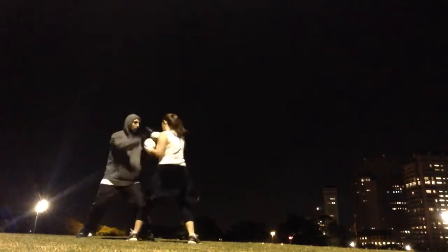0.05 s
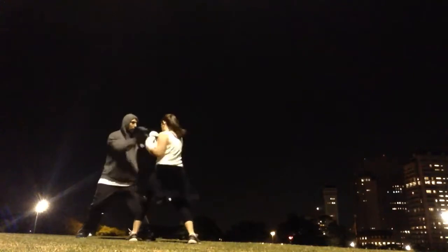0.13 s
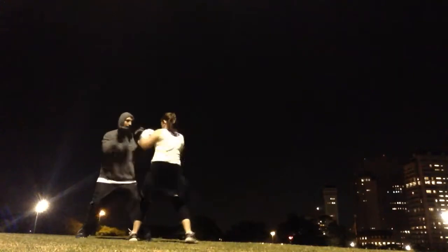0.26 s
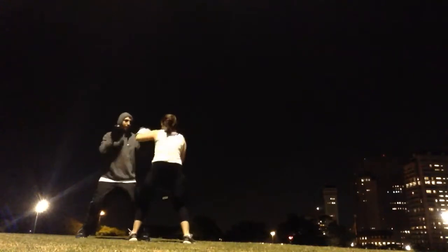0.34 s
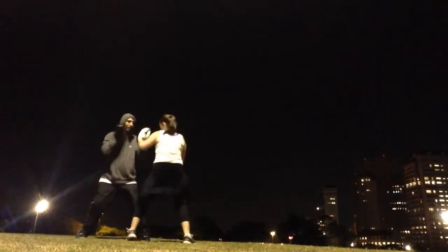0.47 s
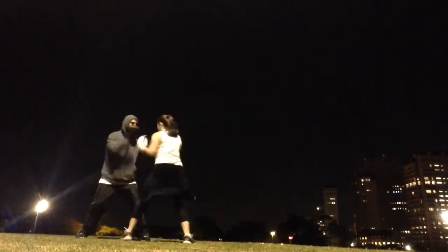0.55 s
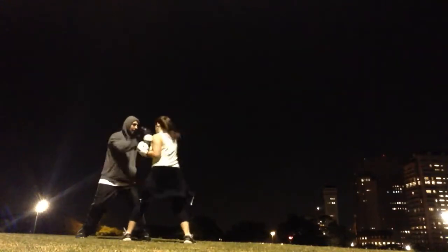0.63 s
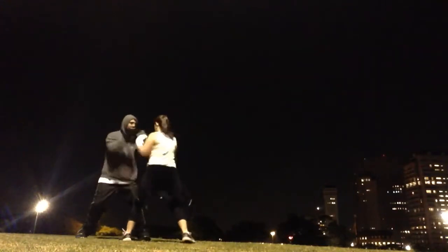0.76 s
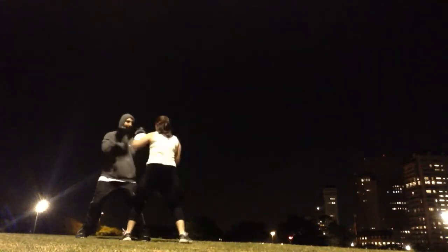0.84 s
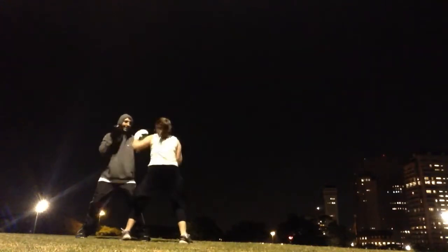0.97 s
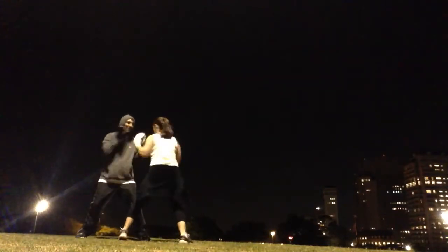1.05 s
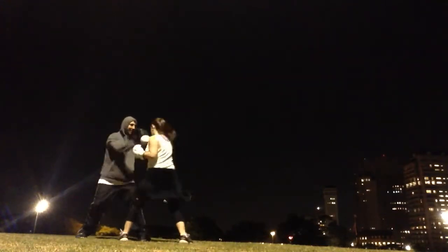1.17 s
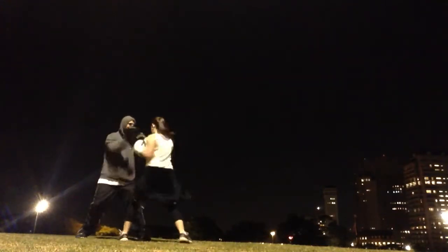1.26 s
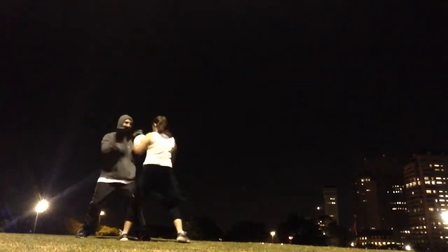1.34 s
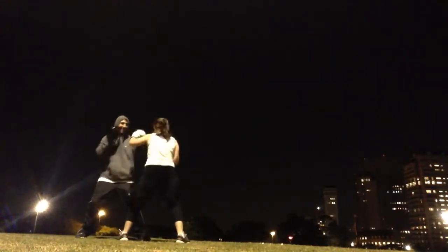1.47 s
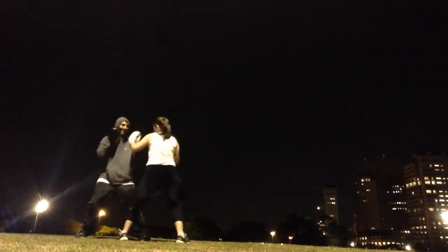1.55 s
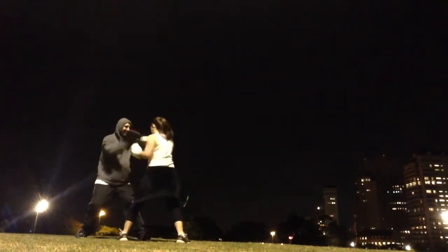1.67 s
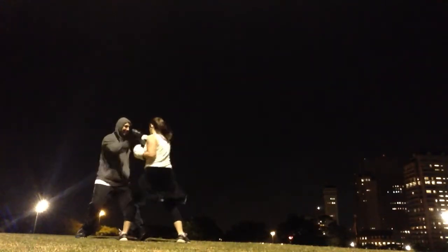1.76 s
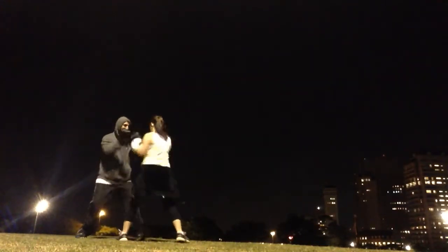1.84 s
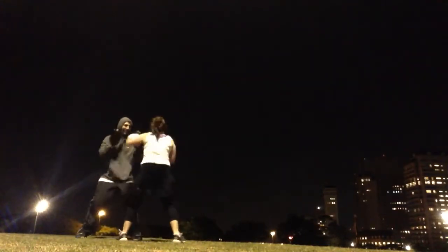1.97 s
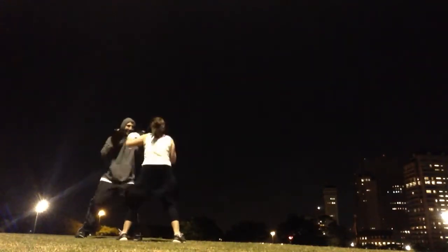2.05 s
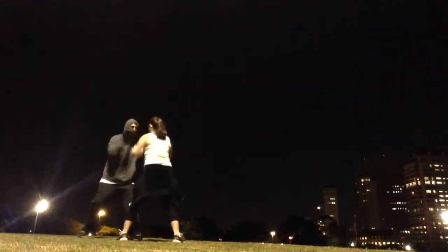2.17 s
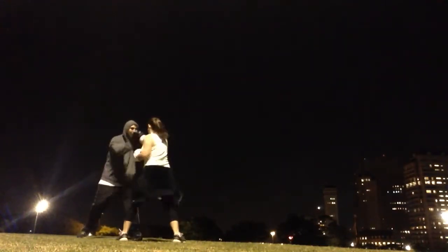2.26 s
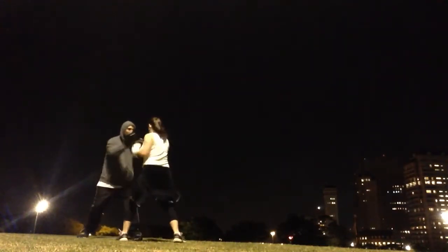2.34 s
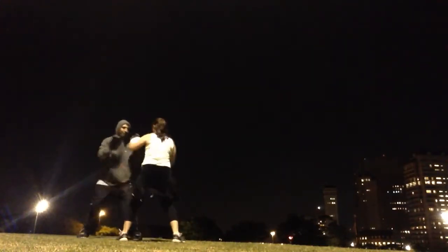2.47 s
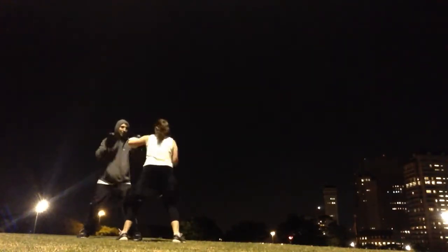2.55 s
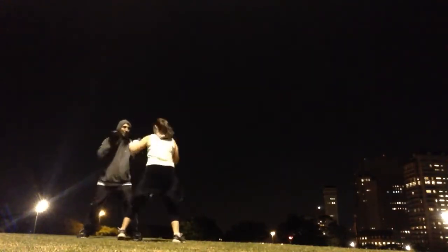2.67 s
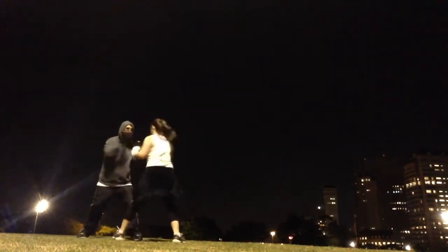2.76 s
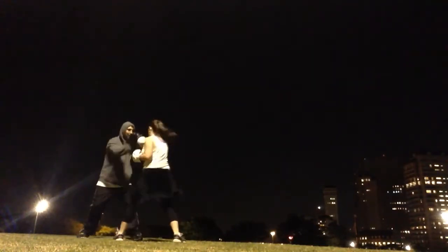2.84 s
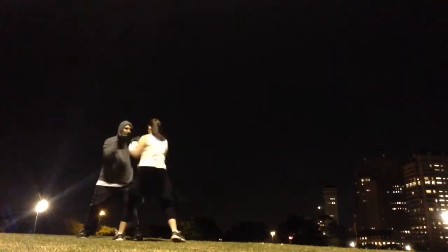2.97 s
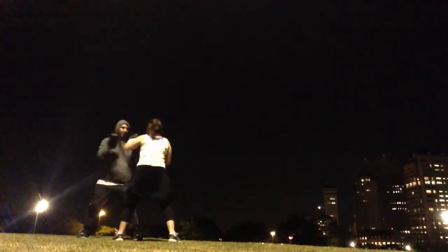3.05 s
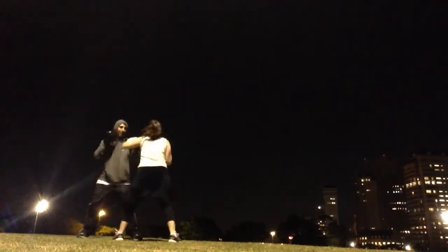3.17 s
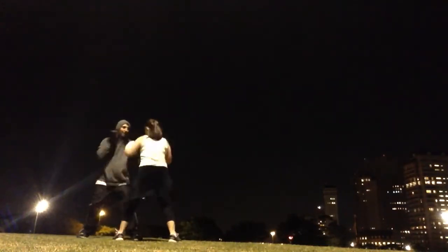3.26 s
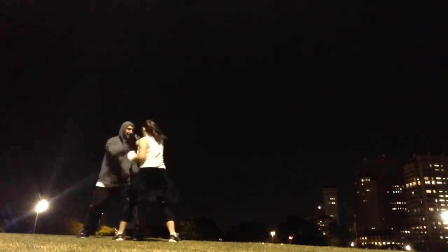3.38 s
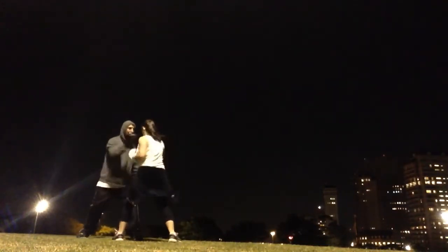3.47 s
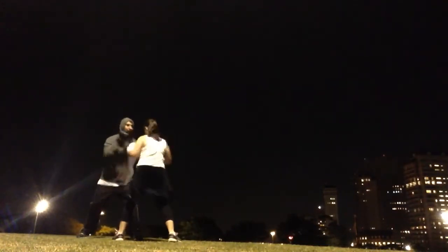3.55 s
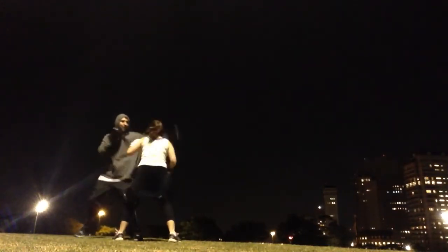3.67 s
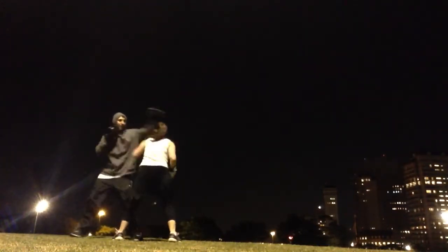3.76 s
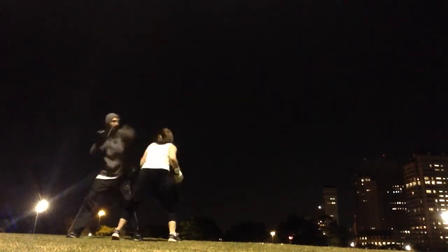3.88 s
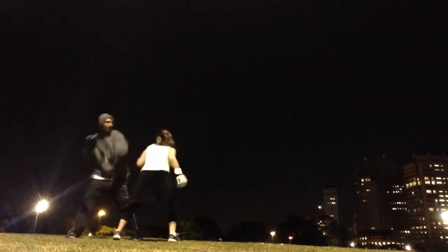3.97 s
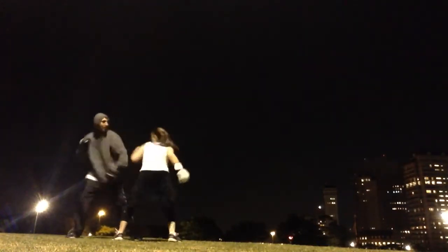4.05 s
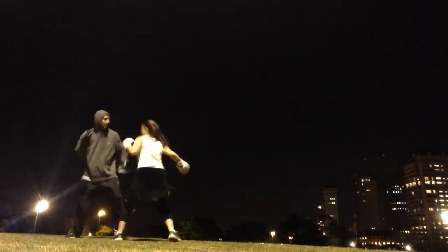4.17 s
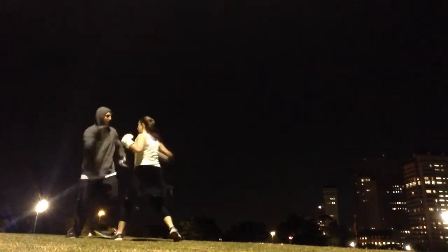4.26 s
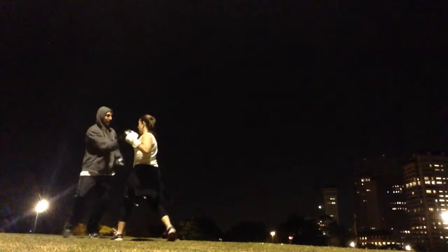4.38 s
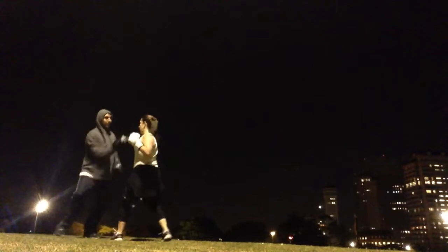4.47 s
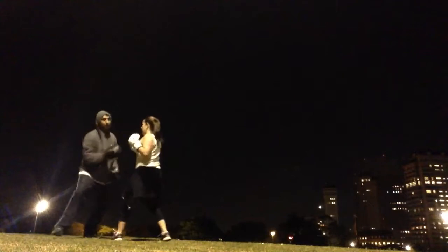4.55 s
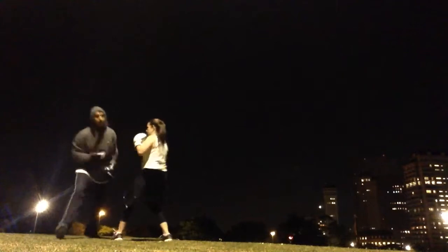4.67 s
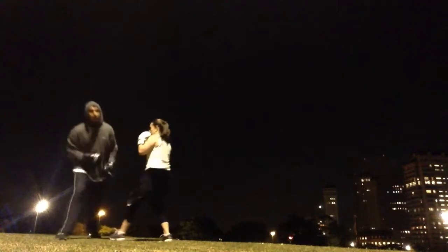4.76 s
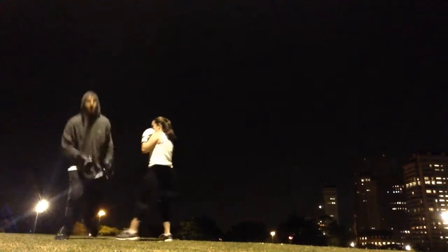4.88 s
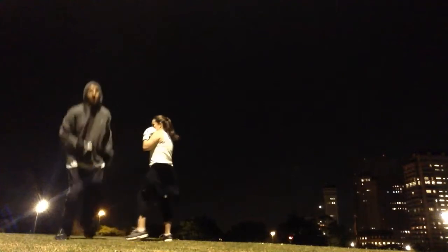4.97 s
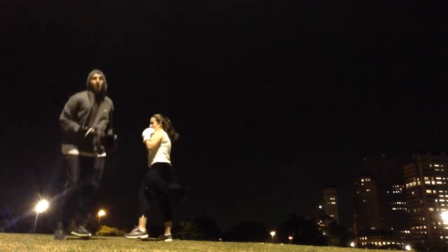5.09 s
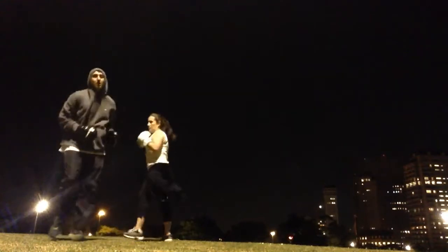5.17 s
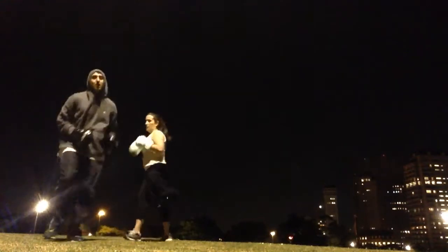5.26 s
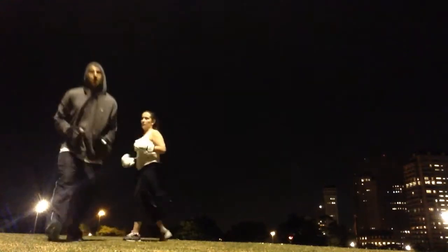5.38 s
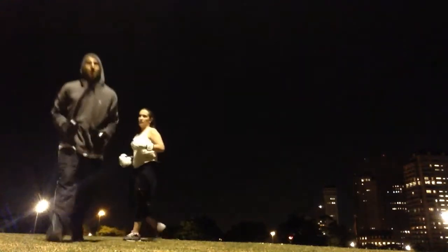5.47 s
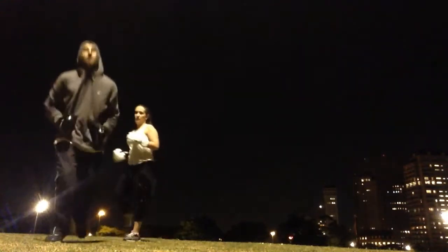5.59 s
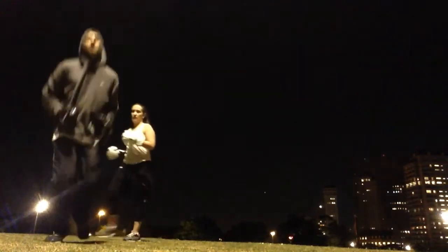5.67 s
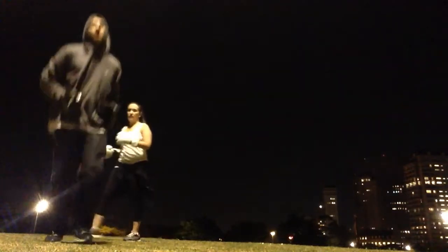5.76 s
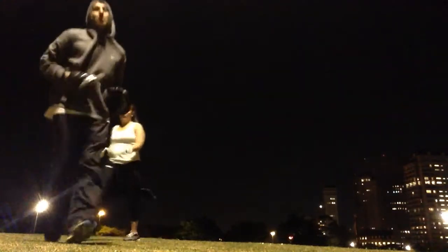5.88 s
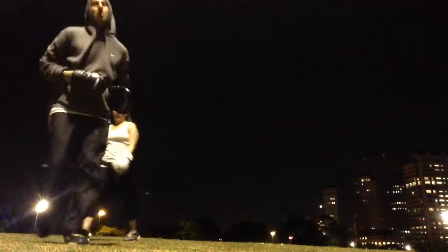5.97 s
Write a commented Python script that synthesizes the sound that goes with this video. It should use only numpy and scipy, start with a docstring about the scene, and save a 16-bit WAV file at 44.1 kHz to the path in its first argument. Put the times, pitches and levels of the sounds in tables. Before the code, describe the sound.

Boxing gloves smack padded mitts in a quick, even run outdoors at night, then one harder final punch after a pause, with rustling clothes and distant traffic.

```python
"""Boxing practice on a lawn

Boxing gloves strike padded mitts in a quick, even run, then once more after a pause, at night.
Each punch adds ringing tones for the padded thud and the pop of trapped air to grainy noise for the leather.
The open lawn returns almost no echo, only a faint tail of fading noise.
Low tones make the footsteps, and shaped noise makes the ticking, rustling clothes and far city traffic."""
import sys
import numpy as np
from scipy import signal
from scipy.fft import rfft, irfft, next_fast_len
from scipy.io import wavfile
from scipy.ndimage import map_coordinates

SR = 44100
rng = np.random.default_rng(int(sys.argv[2]) if len(sys.argv) > 2 else 0)


def wav_record(signal):
    """Record a signal, one row per channel, as 16-bit PCM in the file named by sys.argv[1]."""
    frames = np.transpose(np.atleast_2d(signal))
    bounded = np.clip(frames, -1, 1)
    # unit amplitude maps onto the largest positive 16-bit level
    quanta = np.round(bounded * 32767).astype(np.int16)
    wavfile.write(sys.argv[1], SR, quanta)


N = 265651
AGE = np.arange(SR // 8) / SR  # time inside a short sound (s)


def amp(db):
    """Turn decibels into a gain."""
    return 10 ** (np.asarray(db) / 20)


def unit(x):
    """Scale to an rms of 1."""
    return x / np.sqrt(np.mean(x ** 2) + 1e-20)


def blow(x):
    """Scale a short sound to the energy of 10 ms at an rms of 1."""
    return x * np.sqrt(SR / 100 / (np.sum(x ** 2) + 1e-20))


def along(points, hz):
    """Read values between (Hz, value) points, on a log frequency axis."""
    point_hz, values = np.transpose(points)
    return np.interp(np.log(hz + 1), np.log(point_hz + 1), values)


def curves(rows):
    """Give one value per sample for each column after the time."""
    seconds, *columns = np.transpose(rows)
    return [np.interp(np.arange(N) / SR, seconds, column) for column in columns]


def wobble(rate):
    """Draw a smooth random curve with rate random points a second."""
    points = rng.standard_normal(int(N * rate / SR) + 4)
    return map_coordinates(points, [np.arange(N) * rate / SR])


def noise(spectrum):
    """Make steady coloured noise with an rms of 1."""
    size = next_fast_len(N + 8192)
    gain = amp(along(spectrum, np.fft.rfftfreq(size, 1 / SR)))
    return unit(irfft(rfft(rng.standard_normal(size)) * gain, size)[:N])


def coloured(x, spectrum, size=8192):
    """Colour a short sound without smearing backward in time, so its attack stays sharp."""
    gain = amp(along(spectrum, np.fft.rfftfreq(size, 1 / SR)))
    # folding the cepstrum forward gives a minimum-phase filter
    cepstrum = irfft(np.log(gain))
    cepstrum[1:size // 2] *= 2
    cepstrum[size // 2 + 1:] = 0
    return irfft(rfft(x, size) * np.exp(rfft(cepstrum)))[:len(x)]


def fade(t60):
    """Die away exponentially, by 60 dB in t60 seconds."""
    return np.exp(-np.log(1000) * AGE / t60)


def ring(hz, t60):
    """Sound one tone that dies away, like a struck object."""
    return np.sin(2 * np.pi * hz * AGE) * fade(t60)


def crinkle(t60, spiky_db):
    """Make a dying burst of tiny slips of uneven size."""
    sizes = amp(spiky_db * rng.standard_normal(len(AGE)))
    return rng.standard_normal(len(AGE)) * sizes * fade(t60)


def add(track, s, x):
    """Mix x into the track from time s."""
    i = max(round(s * SR), 0)
    track[i:i + len(x)] += x[:max(len(track) - i, 0)]


# Loudness of the far traffic, before each layer's own trim: start_s, level_db
TRAFFIC_LEVEL = [(0.0, -63), (0.28, -63), (1.79, -64.5), (2.78, -62.5), (3.12, -67), (4.83, -63.5),
                 (6.02, -63.5)]
# Cloth and grass calm down as the run ends, then grow as the boxers walk closer.
# Levels before each layer's trim: start_s, swish_db, hiss_db
RUSTLE_LEVEL = [(0.0, -76, -79.5), (1.05, -80, -83.5), (1.37, -77.5, -81), (1.56, -81.5, -84.5),
                (1.94, -77.5, -83.5), (2.11, -83, -85), (2.75, -79, -80.5), (2.95, -84.5, -82),
                (3.24, -87.5, -88), (4.39, -77, -82.5), (4.61, -78, -72), (5.2, -74, -78),
                (5.38, -68, -73.5), (6.02, -73, -76)]
# Colours of the low traffic, higher traffic, thin hiss and swishing cloth: pitch_hz, level_db
TRAFFIC_RUMBLE = [(15, -44.5), (25, -16.5), (45, -5), (65, 2.5), (90, 0), (140, -4.5), (210, -9.5),
                  (320, -15.5), (500, -34.5), (1000, -62)]
TRAFFIC_WASH = [(150, -28.5), (400, 4), (900, -3.5), (1500, -10), (2500, -17), (5000, -37), (15000, -54)]
HISS_COLOUR = [(1000, -22.5), (4000, -7.5), (7500, -1), (10000, -5), (15000, -3.5), (16000, -26)]
CLOTH_COLOUR = [(1000, -18), (2500, 5), (3800, 2), (5800, -1), (8000, -12), (14000, -22)]


def surroundings():
    """Far traffic, a thin hiss and swishing cloth and grass are noises whose levels waver at random."""
    city_db, = curves(TRAFFIC_LEVEL)
    swish_db, hiss_db = curves(RUSTLE_LEVEL)
    rumble = amp(city_db + 17.5 + 1.8 * wobble(11)) * noise(TRAFFIC_RUMBLE)
    wash = amp(city_db - 0.4 + 0.6 * wobble(5.4)) * noise(TRAFFIC_WASH)
    hiss = amp(hiss_db - 0.55 + 0.7 * wobble(47)) * noise(HISS_COLOUR)
    swish = amp(swish_db - 3 + 1.2 * wobble(34)) * noise(CLOTH_COLOUR)
    return rumble + wash + hiss + swish


# Colour of rubbing cloth, drawn around 1 kHz: pitch_hz, level_db
RUB_COLOUR = [(250, -38.5), (650, -10), (880, -1), (1120, -7), (1500, -11), (3500, -35.5)]


def rubbing(centre_hz):
    """Rubbing cloth is noise gathered around a centre frequency."""
    return noise([(hz * centre_hz / 1000, level_db) for hz, level_db in RUB_COLOUR])


SWING_S, STOP_S = 0.075, 0.035  # time constants of the swish before and after contact (s)


def sleeves():
    """A sleeve swishes up as the arm speeds toward the mitt and dies as it stops."""
    t, swell = np.arange(N) / SR, np.zeros(N)
    for s, *_, swish_db in PUNCH_LIST:
        swell += amp(swish_db) * np.exp(-np.maximum((s - t) / SWING_S, (t - s) / STOP_S))
    return swell * rubbing(centre_hz=4300)


# Colour of the rustling cuff: pitch_hz, level_db
CUFF_COLOUR = [(200, -5), (900, 5), (4500, -9), (12000, -21.5)]


def approach(force_db, crinkle_db):
    """Before contact the rushing glove pulls the pressure down, and its cuff rustles."""
    suction = -amp(force_db - 12.5) * blow(fade(t60=0.0067))
    rustle = coloured(crinkle(t60=0.091, spiky_db=-1.0), CUFF_COLOUR)
    cuff = amp(crinkle_db - 18.5) * blow(rustle)
    return (suction + cuff)[::-1]  # reversed, so that both grow toward the contact


# Colours of the leather's slap and its bright snap: pitch_hz, level_db
SLAP_COLOUR = [(400, -11), (1300, -7), (2800, 0), (6300, 1.5), (8500, -10.5), (16000, -22)]
SNAP_COLOUR = [(3000, -36), (7000, -3.5), (9000, -5), (13000, -8), (16000, -11)]


def crack(crack_db, crack_hz, snap_db):
    """The leather slap drops the pressure steeply, then swings back only once or twice."""
    slap = coloured(-ring(crack_hz, t60=0.00061), SLAP_COLOUR)
    snap = coloured(crinkle(t60=0.0025, spiky_db=3), SNAP_COLOUR)
    return amp(crack_db) * blow(slap) + amp(snap_db - 1.5) * blow(snap)


POP_HZ, POCKET_OCT = 970, 0.025  # pitch at medium depth; drop per dB of depth (octaves)


def air_pop(pop_db, depth_db):
    """Trapped air pops as two short tones; a deeper punch traps a larger, lower pocket."""
    pop_hz = POP_HZ * 2 ** (-POCKET_OCT * depth_db)
    tones = ring(pop_hz, t60=0.007) + 0.5 * ring(1.6 * pop_hz, t60=0.0075)
    return amp(pop_db - 5.5) * blow(tones)


# Colour of the crackle as a glove lifts off: pitch_hz, level_db
PEEL_COLOUR = [(300, -1.5), (1500, -1.5), (4000, -0.5), (6500, -0.5), (8000, -8.5), (12000, -9),
               (16000, -17.5)]


def peel():
    """The leather creaks on after the blow and crackles as the glove lifts off the mitt."""
    swell = np.exp(-0.5 * ((AGE - 0.035) / 0.008) ** 2) + 2.0 * fade(t60=0.2)
    # the size of the slips wanders, so the grains come in clumps
    slips = np.interp(AGE, AGE[::64], rng.standard_normal(len(AGE[::64])))
    grains = rng.standard_normal(len(AGE)) * amp(6.8 * slips)
    return blow(coloured(grains * swell, PEEL_COLOUR))


# Colour of the crinkling leather: pitch_hz, level_db
LEATHER_COLOUR = [(500, -19.5), (1500, 4), (3500, 1), (6000, -1), (8000, -4.5), (12000, -14.5),
                  (16000, -21)]


def creasing(crinkle_db):
    """The leather crinkles at the blow, with a fainter creak and peel after it."""
    leather = coloured(crinkle(t60=0.022, spiky_db=7.5), LEATHER_COLOUR)
    return amp(crinkle_db + 3.5) * blow(leather) + amp(crinkle_db - 17.0) * peel()


# The padding's deep tones, each punch shifting them slightly: pitch_hz, level_db, t60_s
PADDING_TONES = [(96, 1, 0.042), (180, 5.5, 0.028), (251.7, 0.5, .02)]
# Colour of the crushed foam: pitch_hz, level_db
FOAM_COLOUR = [(150, -16.5), (350, -4), (600, 3), (800, 2.5), (1050, -15.5), (2500, -26)]
FOAM_DB, KNOCK_DB, KNOCK_HZ = -37.5, -32, 391  # at medium depth
# a deeper punch knocks louder (dB per dB) and stiffens the pad (octaves per dB)
KNOCK_GROWS, STIFFEN_OCT = 0.6, 0.028


def padding(force_db, depth_db):
    """The padding gives with a deep thud, a knock of the compressed pad and a puff of foam."""
    size = np.exp(0.03 * rng.standard_normal())  # every glove lands a little differently
    tones = sum(amp(db) * ring(hz * size, t60) for hz, db, t60 in PADDING_TONES)
    thud = amp(force_db + 1.5) * blow(tones)
    knock_hz = KNOCK_HZ * 2 ** (STIFFEN_OCT * depth_db)
    knock = amp(KNOCK_DB + KNOCK_GROWS * depth_db) * blow(ring(knock_hz, t60=0.016))
    puff = coloured(crinkle(t60=0.022, spiky_db=0), FOAM_COLOUR)
    return thud + knock + amp(FOAM_DB + depth_db) * blow(puff)


# Colour of a tick: pitch_hz, level_db
TICK_COLOUR = [(2000, -27.5), (6000, -9.5), (9000, -4), (13000, -2), (16000, -16)]


def tick(db):
    """One small click of cloth, strap or leather is a short grainy burst."""
    return amp(db - 16.5) * blow(coloured(crinkle(t60=0.04, spiky_db=1.5), TICK_COLOUR))


# Every punch, levels before each part's own trim: start_s, force_db, depth_db (into the foam),
# pop_db (trapped air), crack_db, crack_hz, snap_db (bright snap), swish_db (sleeve)
PUNCH_LIST = [(0.1421, -25.5, -1, -34, -37, 3600, -34, -68), (0.4066, -26, 5.5, -21.5, -27, 3040, -63, -72),
              (0.6873, -24.5, -1.5, -35, -24.5, 4800, -42, -65),
              (0.9607, -24, 1.5, -23.5, -29.5, 3748, -60.5, -78),
              (1.2348, -27.5, 0, -49.5, -24, 5520, -42.5, -72),
              (1.5015, -26.5, 0.5, -23.5, -25.5, 4380, -42, -81.5),
              (1.7826, -27.5, -7, -31.5, -25.5, 4500, -31.5, -72),
              (2.0547, -28, 4.5, -28, -30, 3810, -43, -78.5),
              (2.3143, -26.5, -4.5, -37.5, -41.5, 7070, -35, -82),
              (2.6013, -26, 3, -28.5, -35.5, 3700, -51, -82),
              (2.9012, -31.5, -3.5, -37.5, -25.5, 4200, -29, -70),
              (3.1702, -29, 1, -29, -41.5, 4800, -45, -81),
              (3.4602, -28, -6.5, -54.5, -30, 4195, -37.5, -86.5),
              (4.4405, -23, 11, -47, -27, 6000, -39.5, -80.5)]
CRINKLE_DB, SNAP_SHARE = -11.5, 0.12  # crinkle against the force; share taken from the snap
LIFT_S, LIFT_DB = 0.036, -21  # tick as the glove leaves: delay, and setting against the snap's


def punches():
    """The leather faces slap together, trapped air pops out and the padding gives."""
    faces, body = np.zeros(N), np.zeros(N)
    for s, force_db, depth_db, pop_db, crack_db, crack_hz, snap_db, _ in PUNCH_LIST:
        # the crinkle follows the force of the punch and, in part, its snap
        crinkle_db = CRINKLE_DB + force_db + SNAP_SHARE * (snap_db - force_db)
        add(body, s - len(AGE) / SR, approach(force_db, crinkle_db))
        add(faces, s - 0.0001, crack(crack_db, crack_hz, snap_db))
        add(faces, s + 0.00017, air_pop(pop_db, depth_db) + creasing(crinkle_db))
        add(body, s + 0.00056, padding(force_db, depth_db))
        add(faces, s + LIFT_S, tick(snap_db + LIFT_DB))
    # a small mitt cannot radiate the deepest bass
    bass_cut = signal.butter(2, 58, "highpass", fs=SR, output="sos")
    return faces + signal.sosfilt(bass_cut, body)


# How long the scattered sound lasts: pitch_hz, t60_s
SCATTER_TIME = [(200, 0.6), (1500, 0.63), (5000, 0.059), (12000, 0.11)]


def park(hits):
    """Bodies, lawn and trees scatter a faint tail of fading noise, different for each punch."""
    out = np.zeros(N)
    for s, *_ in PUNCH_LIST:
        hz, t, cells = signal.stft(rng.standard_normal(SR // 3), SR, nperseg=256)
        decay = np.exp(-np.log(1000) * t / along(SCATTER_TIME, hz)[:, None])
        tail = signal.istft(cells * decay, SR, nperseg=256)[1]
        tail *= amp(-35.5) / np.linalg.norm(tail)
        start = s - 0.01  # begin just ahead of the contact
        punch = hits[round(start * SR):][:len(AGE)]
        add(out, start, signal.fftconvolve(punch, tail))
    return out


# Gloves sliding off the mitts and shoes scuffing the grass, levels before the random grain:
# middle_s, level_db, pitch_hz (centre), half_length_s
BRUSH_LIST = [(0.169, -58, 3900, 0.036), (1.251, -61.5, 5260, .03), (4.527, -61, 2600, 0.011),
              (4.714, -75, 9380, 0.025), (5.79, -66, 7170, 0.014), (5.983, -65, 2400, 0.017),
              (6.008, -53, 546, 0.013)]


def brushes():
    """Cloth, leather or grass rub past each other in short grainy swells of noise."""
    out, t = np.zeros(N), np.arange(N) / SR
    for s, db, centre_hz, half_s in BRUSH_LIST:
        swell = np.exp(-0.5 * ((t - s) / half_s) ** 2)
        out += amp(db) * swell * rubbing(centre_hz)
    return out * amp(1.6 * wobble(250))


# The clearest ticks of clothing and straps, before the tick's own trim: start_s, level_db
CLEAR_TICKS = [(0.2881, -53), (0.4873, -52.5), (0.824, -47.5), (1.3834, -54), (2.4676, -50),
               (2.7645, -54.5), (5.5788, -52), (5.7817, -53.5)]
TICKS_PER_S = 4.4  # fainter ticks, at random times
FAINT_TICK_DB, TICK_SPREAD_DB = 18.5, 3.5  # setting above the hiss curve, before trim; random spread


def clothing():
    """Clothing gives a few clear ticks, and faint random ones that follow the rustle."""
    out = np.zeros(N)
    _, hiss_db = curves(RUSTLE_LEVEL)
    for s, db in CLEAR_TICKS:
        add(out, s, tick(db))
    for place in rng.random(round(TICKS_PER_S * N / SR)):
        i = int(place * N)
        faint_db = hiss_db[i] + FAINT_TICK_DB + TICK_SPREAD_DB * rng.standard_normal()
        add(out, i / SR, tick(faint_db))
    return out


# Feet on the turf, before the step's own trim: start_s, level_db
STEP_LIST = [(2.388, -30.5), (2.435, -29), (2.499, -30.5), (2.737, -27), (2.822, -32.5), (2.989, -28),
             (3.216, -30), (4.48, -26.5), (5.287, -32), (5.459, -37)]


def footwork():
    """A footfall on grass is two low tones, varied at random, with a soft start."""
    out = np.zeros(N)
    for s, db in STEP_LIST:
        low = ring(115 * np.exp(0.17 * rng.standard_normal()), t60=0.073)
        high = ring(260 * np.exp(0.29 * rng.standard_normal()), t60=0.05)
        soft_start = 1 - fade(t60=0.014)
        add(out, s, amp(db - 3.0) * (low + 0.5 * high) * soft_start)
    return out


def scene():
    """Mix everything, as heard from a few metres away at grass level."""
    hits = punches()
    mix = surroundings() + sleeves() + hits + park(hits) + brushes() + clothing() + footwork()
    return mix[None]


TOP_HZ, SLOPE_HZ = 15950, 900  # nothing passes above the top; the slope below it leads there


def record(dry):
    """The microphone sheds the deepest bass and keeps nothing above its band limit."""
    bass_cut = signal.butter(2, 32, "highpass", fs=SR, output="sos")
    thin = signal.sosfilt(bass_cut, dry)
    size = next_fast_len(N + SR // 2)
    passed = np.clip((TOP_HZ - np.fft.rfftfreq(size, 1 / SR)) / SLOPE_HZ, 0, 1)
    return irfft(rfft(thin, size) * np.sin(np.pi / 2 * passed) ** 2, size)[:, :N]


dry = scene()
out = record(dry)
wav_record(out)
```